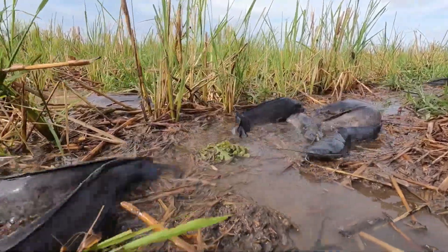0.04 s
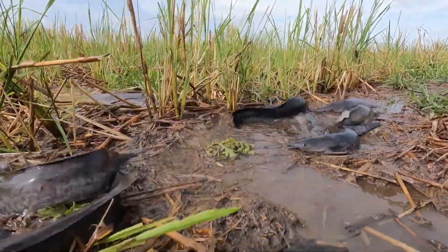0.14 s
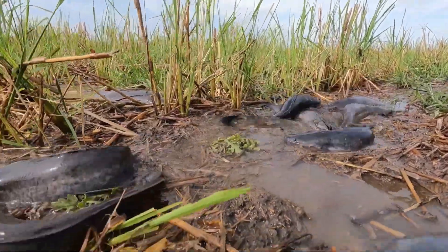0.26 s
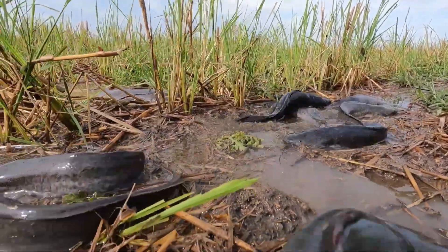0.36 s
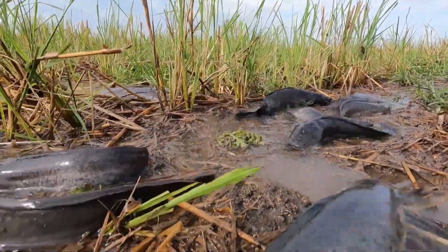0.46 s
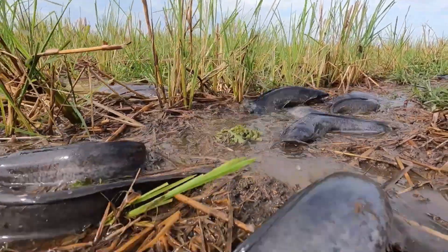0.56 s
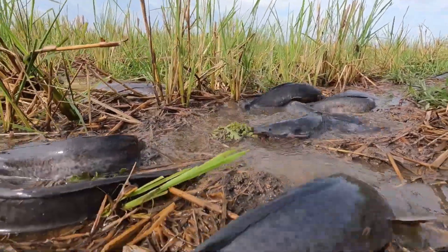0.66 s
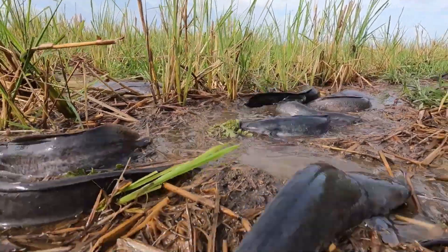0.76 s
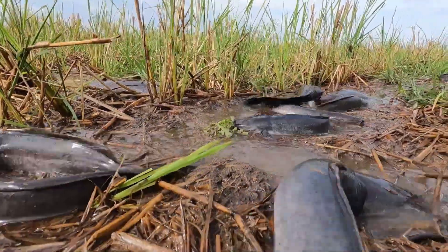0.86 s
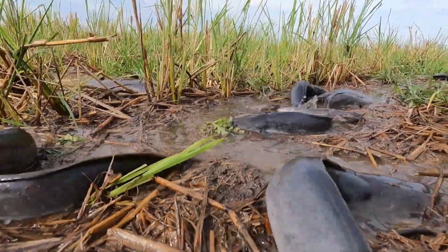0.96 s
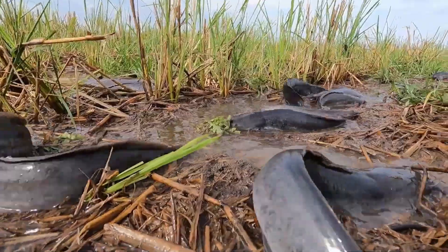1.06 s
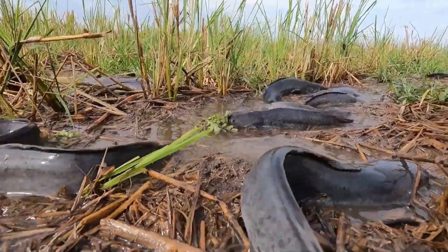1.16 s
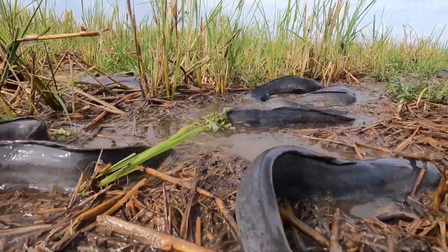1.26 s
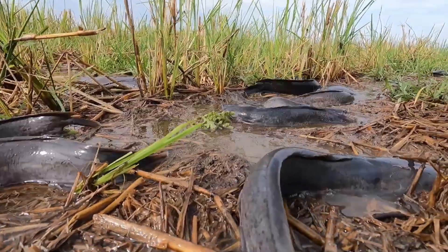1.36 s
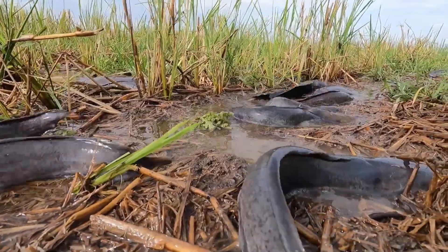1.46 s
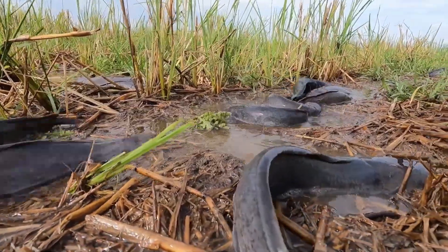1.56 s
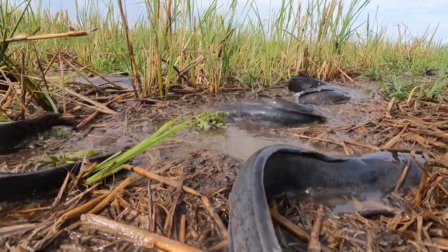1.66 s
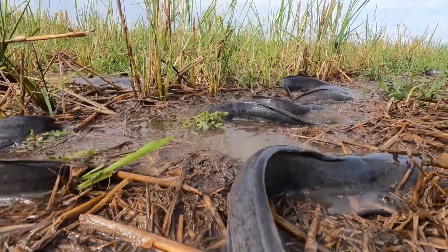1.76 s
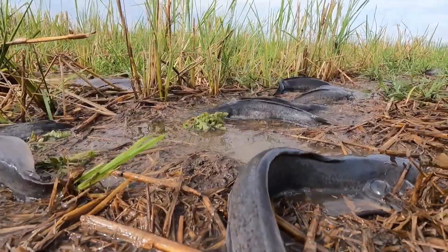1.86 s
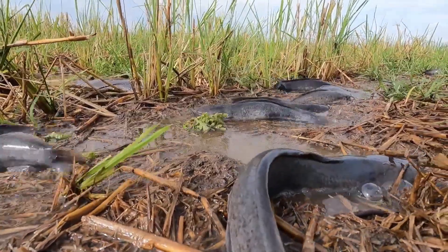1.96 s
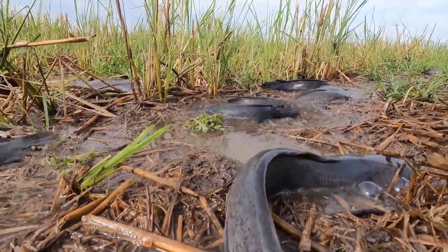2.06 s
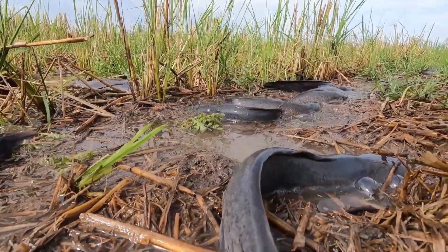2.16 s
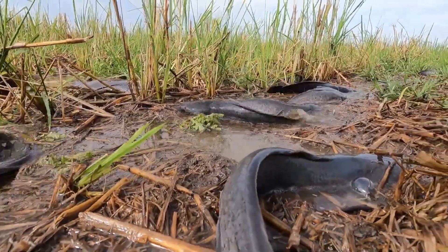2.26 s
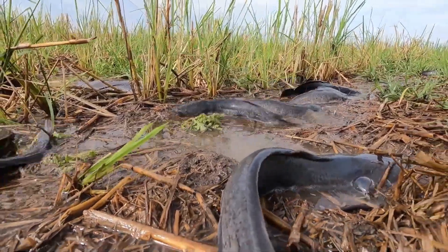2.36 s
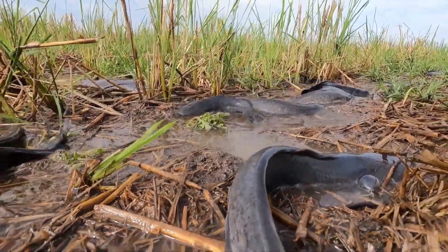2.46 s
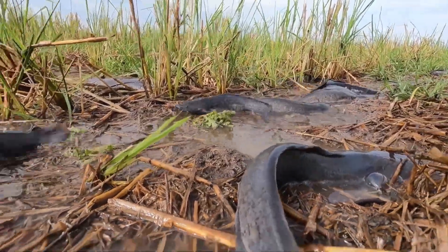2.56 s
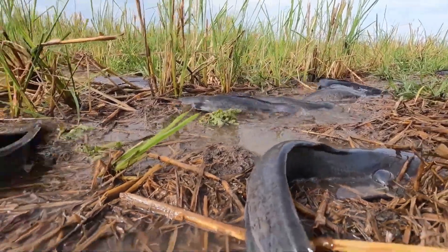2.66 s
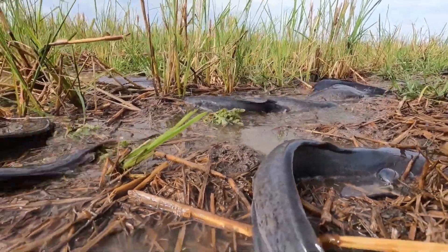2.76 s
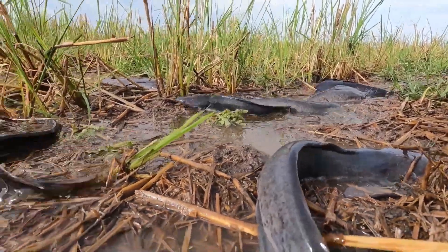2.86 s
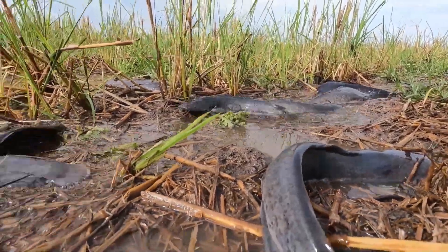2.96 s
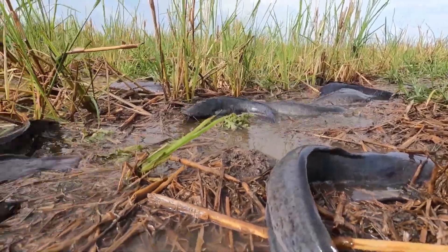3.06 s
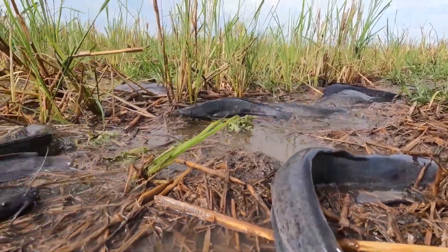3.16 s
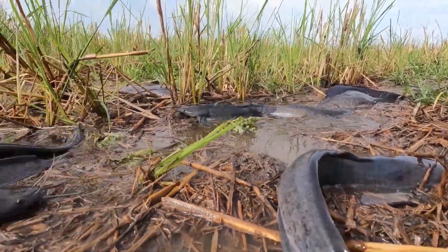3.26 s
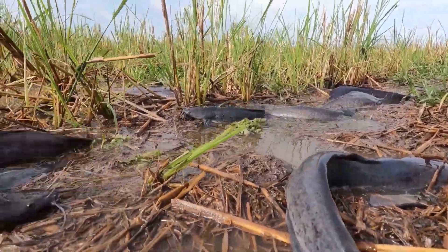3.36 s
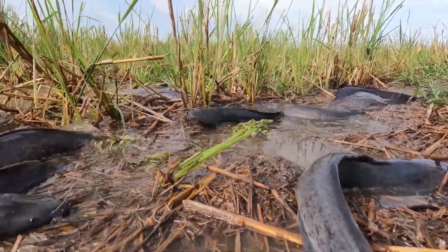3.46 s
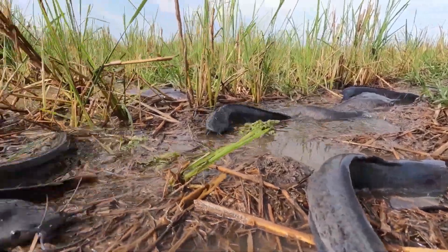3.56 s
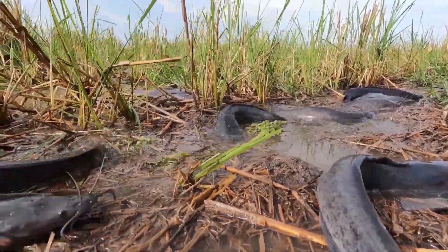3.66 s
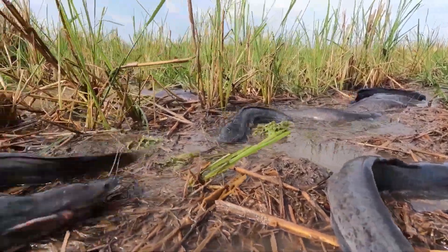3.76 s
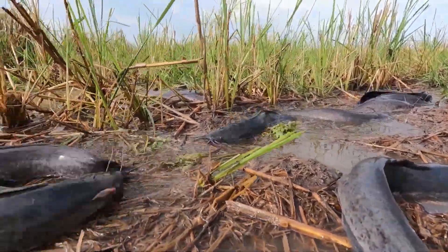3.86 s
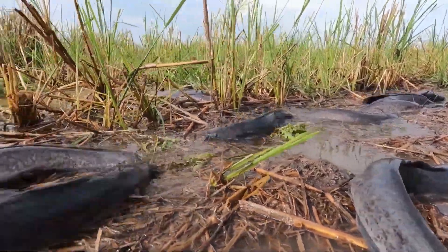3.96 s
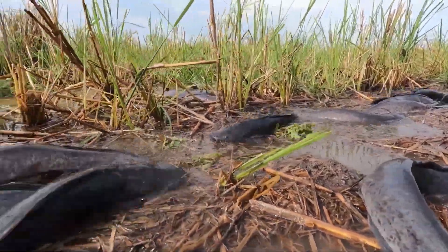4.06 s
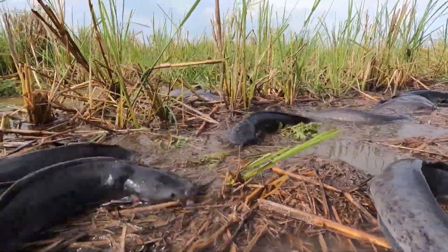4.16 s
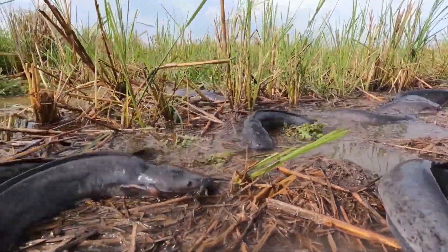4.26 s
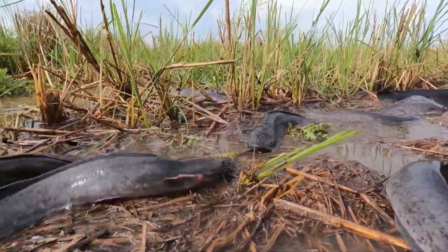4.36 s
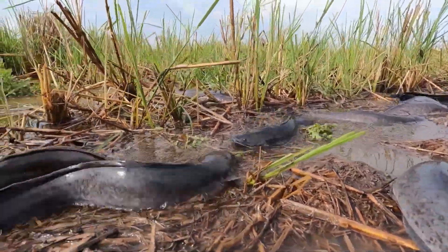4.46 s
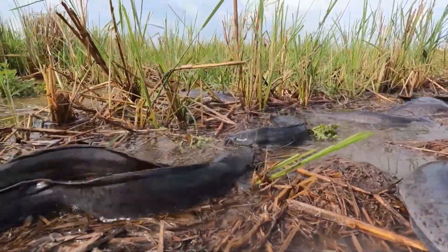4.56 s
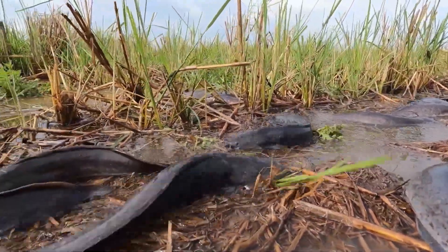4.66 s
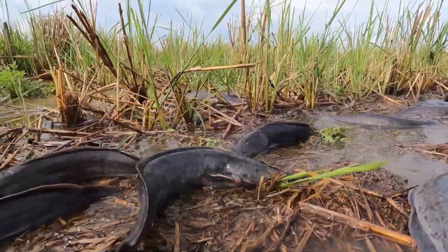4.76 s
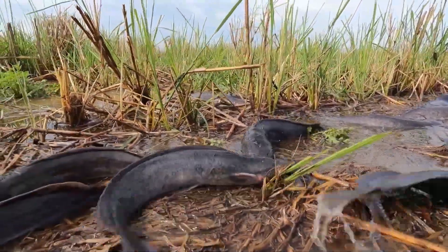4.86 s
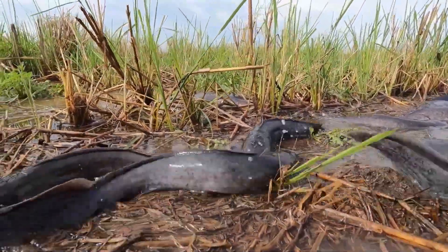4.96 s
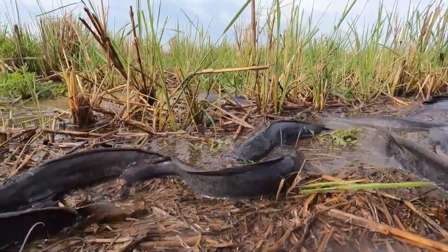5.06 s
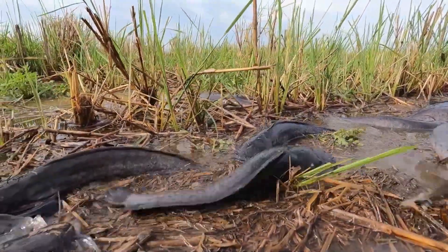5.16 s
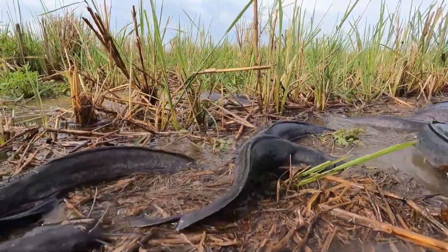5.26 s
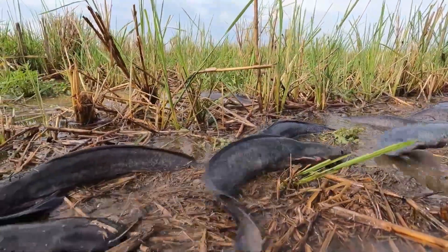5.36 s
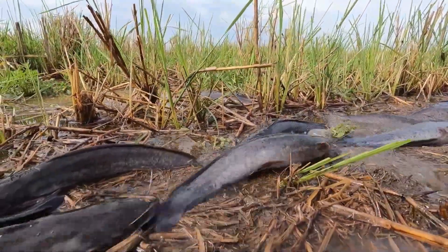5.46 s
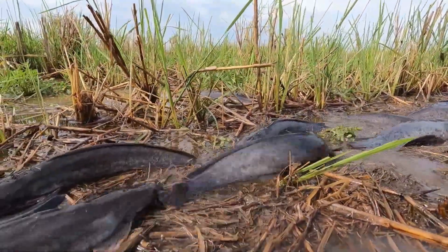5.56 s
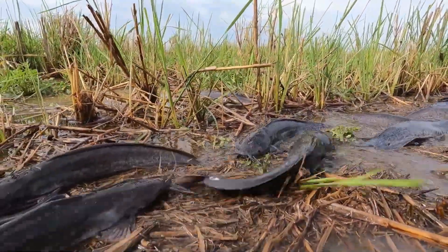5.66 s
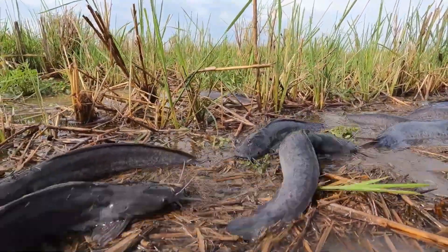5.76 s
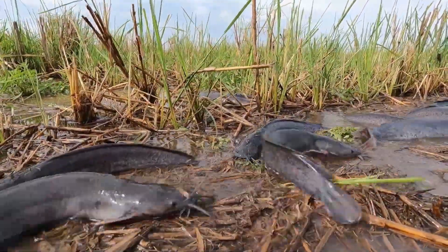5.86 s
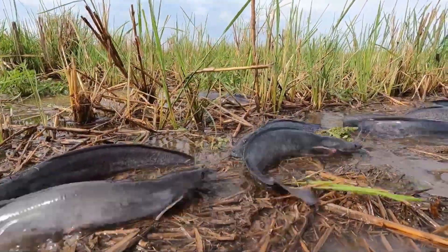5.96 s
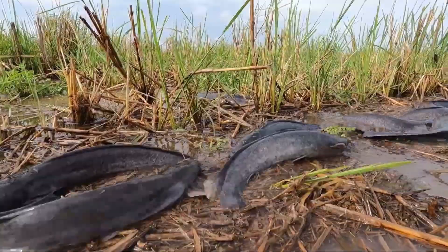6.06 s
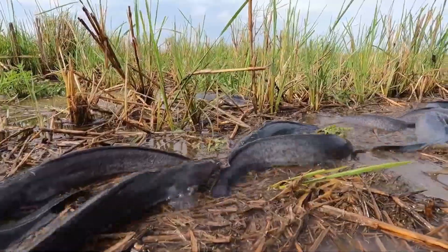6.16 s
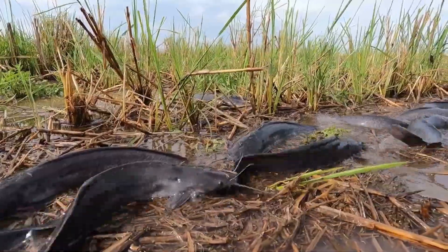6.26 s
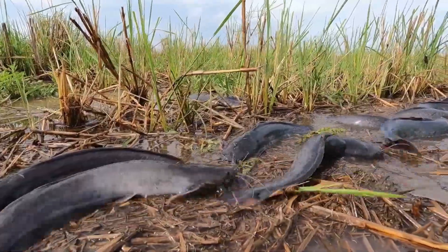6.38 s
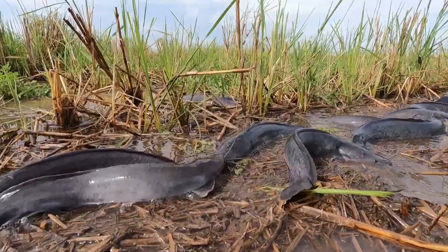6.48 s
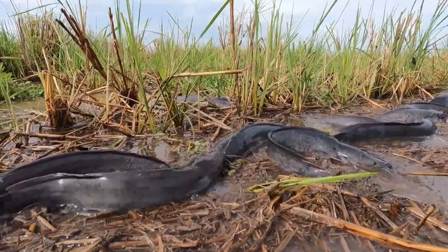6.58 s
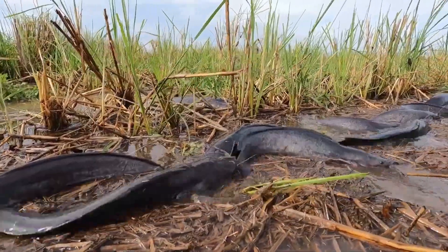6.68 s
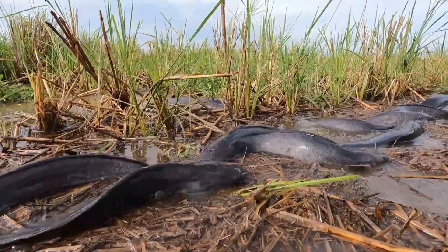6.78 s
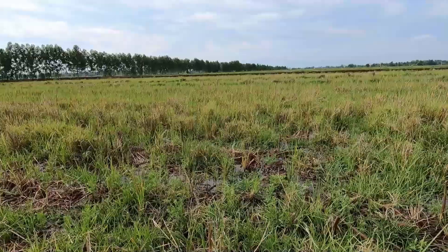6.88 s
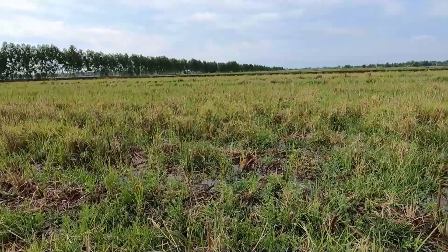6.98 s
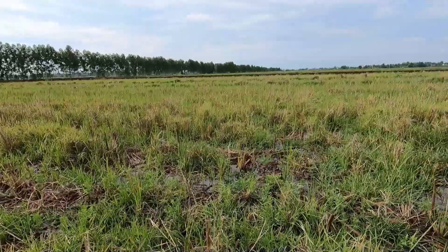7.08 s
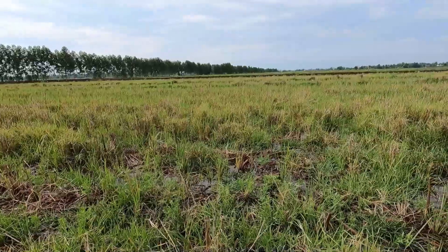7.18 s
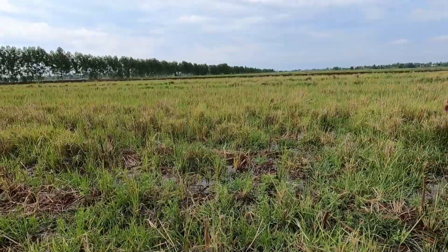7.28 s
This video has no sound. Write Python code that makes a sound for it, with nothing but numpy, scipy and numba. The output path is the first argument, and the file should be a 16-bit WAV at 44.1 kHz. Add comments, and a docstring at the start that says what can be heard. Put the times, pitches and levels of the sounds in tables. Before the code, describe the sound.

Close to a microphone on the ground, large catfish squirm in a shallow muddy puddle among wet straw. A busy rush of splashes, wet snaps and pops leads to heavy low thumps in the first second. Then sparser squelches, ticks and bubbles, two short croaks, and a busier wet stretch later. A steady low rumble lies underneath outdoors; a faint scrape with thin metallic ringing closes it.

```python
"""A shallow mud puddle among wet straw: large catfish wriggle close to a microphone on the ground.
Spray, slosh and sucking mud are crowds of tiny fading rings; snaps and pops add a crack and droplets.
Bubbles are gliding tones, a croak is a row of pulses through a throat, and a thump is a low ring.
Shaped noise makes a steady low rumble and faint air; soft tones make a bird's far-off hoots.
At the end a faint hiss comes with narrow metallic rings."""
import sys
import numpy as np
from scipy import signal
from scipy.fft import rfft, irfft
from scipy.io import wavfile
from scipy.ndimage import uniform_filter1d
from numba import njit

SR = 44100
rng = np.random.default_rng(int(sys.argv[2]) if len(sys.argv) > 2 else 0)


def unload_audio(sound):
    """Save the sound as a 16-bit wav file, at the path given as the first command line argument."""
    columns = np.transpose(np.atleast_2d(sound))
    # keep every value between -1 and 1, then stretch to whole-number steps
    steps = np.round(np.clip(columns, -1, 1) * 32767)
    wavfile.write(sys.argv[1], SR, steps.astype(np.int16))


N = 322812
T = np.arange(N) / SR  # time of every sample, s
LN1000 = np.log(1000)  # a fall of 60 dB
TOP_HZ = 15000  # nearly all sound above this is cut

# Low rumble over time: time_s, level_db
RUMBLE_LEVEL = [(0, -39), (.65, -39.5), (1.1, -43.5), (2.2, -40.5), (3.3, -40.5), (5, -42), (7.32, -39)]
# Tone of the rumble: pitch_hz, relative level_db (per Hz)
RUMBLE_TONE = [(12, -52), (20, -19.5), (48, 6.5), (70, -2), (151, -14.5), (420, -31.5), (560, -36),
               (910, -56), (1540, -120)]
# Left-right difference in the rumble: pitch_hz, level_db against the middle
RUMBLE_SIDES = [(60, -28.0), (130, -16.5), (300, -9.5)]
# Tone of the faint air noise: pitch_hz, relative level_db (per Hz)
AIR_TONE = [(530, -34), (900, 0), (1330, 4), (2120, 0), (5000, -3), (7900, -13), (9100, -6), (11200, -22),
            (14300, -40)]
# Left-right difference in the air: pitch_hz, level_db against the middle
AIR_SIDES = [(1000, 1), (7000, -1), (13000, 21)]
# Faint soft hoots far off, perhaps a dove: start_s, length_s, pitch_hz, level_db
HOOTS = [ (3.618, 0.057, 390, -57), (3.853, 0.05, 398, -57), (4.203, 0.077, 392, -61),
         (4.419, .085, 397, -58.5)]
# Narrow metal rings: pitch_hz, fade_db_per_s, level_db (before the ringing curve)
METAL_RINGS = [(587, 10, -57), (845, 120, -61), (1105, 150, -53), (1434, 250, -55), (1654, 30, -50),
               (1900, 40, -61)]
# How strongly the metal rings over time: time_s, level_db
RINGING_LEVEL = [(7.09, -12), (7.13, 6), (7.22, 6), (7.25, -5), (7.32, -4)]
# Hiss of the closing scrape over time: time_s, level_db (before it flickers)
SCRAPE_LEVEL = [(6.94, -54), (7.04, -46), (7.08, -49), (7.11, -43), (7.22, -41), (7.24, -44.5),
                (7.32, -52.5)]
# Tone of the scrape: pitch_hz, relative level_db
SCRAPE_TONE = [(400, -15), (1200, 3.5), (4500, 3), (6800, -8.5), (9000, -21), (15000, -56)]
# Left-right difference in the scrape: pitch_hz, level_db against the middle
SCRAPE_SIDES = [(1000, -46), (8000, -38)]
# Blows on the ground: start_s, level_db, pitch_hz, fade_s (by 60 dB), left_minus_right_db
GROUND_BLOWS = [(0.634, -18, 37.4, 0.15, 5), (0.652, -10.5, 41.5, 0.23, 4), (0.686, -11.5, 134, 0.039, -11),
                (0.715, -9, 64, 0.096, -5.5), (0.738, -10, 53, 0.093, -5), (0.754, -13.5, 100, 0.067, -4),
                (0.775, -26, 43.5, 0.14, -11), (6.575, -27.5, 168, 0.021, -19.5)]
# The body dragging over the ground: time_s, level_db
SCUFF_LEVEL = [(.64, -64), (.685, -27), (.76, -34), (.8, -64)]
# Tone of the dragging: pitch_hz, relative level_db
SCUFF_TONE = [(40, -18), (120, 6.0), (250, -4.0), (600, -41), (1500, -73)]
# Left-right difference in the dragging: pitch_hz, level_db against the middle
SCUFF_SIDES = [(100, -13), (300, -1)]
# Croaks: start_s, length_s, average pulses_per_s, pulse level_db (before the throat)
CROAK_CALLS = [(2.064, 0.11, 140, -15), (2.408, 0.13, 125, -4.5)]
# Hollow tones of the fish's body: pitch_hz, width_hz, level_db
THROAT_TONES = [(357, 157, 9), (580, 100, -3), (960, 360, -6)]
# Bubbles: start_s, level_db (before the waver), start_pitch_hz, end_pitch_hz, length_s
BUBBLE_CHIRPS = [(0.697, -37, 603, 860, 0.012), (0.799, -36.5, 1310, 1640, 0.014),
                 (0.878, -31.5, 996, 1760, 0.029), (1.023, -39, 2010, 2420, 0.012),
                 (1.353, -43, 1560, 1230, 0.026), (1.536, -48, 1850, 2150, 0.019),
                 (1.684, -34, 3660, 3800, .008), (1.707, -46, 2470, 3300, 0.032),
                 (1.811, -47, 1230, 1840, 0.033), (2.236, -50, 880, 1020, 0.025),
                 (2.259, -39, 1840, 2800, 0.016), (2.174, -40, 1770, 1850, 0.012),
                 (2.471, -35.5, 1550, 1750, 0.029), (2.87, -46, 1570, 1800, 0.0081),
                 (3.101, -30.5, 870, 940, 0.0088), (3.171, -33.5, 980, 2000, 0.03),
                 (3.218, -43, 940, 1200, 0.02), (3.472, -44, 755, 2270, 0.038),
                 (4.745, -47, 1710, 2400, 0.026), (4.751, -48.5, 1062, 1100, 0.017),
                 (4.88, -42.5, 1700, 1730, .016), (5.263, -35.5, 1560, 1710, 0.013),
                 (5.29, -49, 1210, 1400, 0.015), (5.369, -41, 1045, 1430, 0.029),
                 (5.681, -43.5, 1210, 1550, 0.025), (5.958, -36.5, 1020, 870, 0.025),
                 (6.005, -49, 787, 1030, 0.046), (6.069, -37.5, 500, 640, 0.015),
                 (6.082, -61, 643, 1350, 0.037), (6.173, -45.5, 625, 970, 0.016),
                 (6.275, -44, 1260, 1170, 0.01), (6.293, -43, 1660, 1760, 0.011),
                 (6.254, -33.5, 1340, 1540, 0.019), (6.326, -40.5, 676, 790, 0.02),
                 (6.374, -41.5, 1130, 925, 0.024), (6.408, -44, 864, 700, 0.015),
                 (6.449, -41.5, 653, 1800, 0.059), (6.45, -43, 2030, 3250, 0.016),
                 (6.533, -45.5, 907, 1530, 0.034), (6.732, -43, 1190, 1590, 0.026),
                 (6.834, -41.5, 1400, 1390, 0.018)]
# Air pockets popping out of the mud: start_s, level_db, pitch_hz, left_minus_right_db
MUD_POPS = [(.064, -29.5, 1590, -5), (0.102, -32, 2400, 4), (0.1149, -32, 2500, 6),
            (0.2653, -20.5, 2110, -1), (0.2963, -21.5, 2400, 2), (0.3127, -10.5, 1250, 1),
            (0.3195, -14.5, 1740, 8), (0.3655, -18, 1900, 0), (0.4022, -34.5, 1950, 8),
            (0.462, -18.5, 1550, 1), (0.4906, -21.5, 1640, 9), (0.5333, -21.5, 2100, 1),
            (0.6193, -23, 1680, 2), (0.6668, -34, 1550, 4), (0.7257, -26, 2870, -7),
            (0.7463, -21.5, 2140, 6), (0.8812, -30, 1100, -1), (1.1163, -27.5, 1470, 1),
            (1.321, -30, 1570, -1), (1.3979, -34, 1610, -1), (1.488, -40, 1510, 0), (1.515, -35.5, 1300, 3),
            (1.7839, -28, 1900, 1), (2.02, -38, 1530, 2), (2.1376, -27.5, 2300, 1),
            (2.1561, -31.5, 1490, 0), (2.6632, -30.5, 1730, 3), (2.7121, -31, 1700, -7),
            (2.7703, -26, 2330, -8), (2.785, -30, 1960, -5), (3.1067, -28.5, 2120, 1),
            (3.1556, -25, 2340, -6), (3.2193, -26, 1110, 0), (3.2514, -35.5, 1780, -8),
            (3.707, -35.5, 1440, -3), (3.737, -38, 1240, -3), (3.7548, -33.5, 2330, 2),
            (3.893, -14, 1345, -1), (4.158, -39.5, 1740, -2), (4.2465, -32.5, 2140, -10),
            (4.3057, -38, 1500, -4), (4.5453, -25, 3070, -7), (4.5789, -28.5, 820, -3),
            (4.5987, -30.5, 1800, -9), (4.7798, -25, 2480, -6.5), (4.8344, -28.5, 2840, -8),
            (5.0061, -32.5, 1410, 0), (5.1236, -31, 1610, 6), (5.1359, -13.5, 1516, -4),
            (5.189, -39, 1820, 2), (5.5665, -29.5, 1660, 7), (5.6184, -27, 1690, 0),
            (5.6672, -30.5, 1460, 1), (5.855, -32, 1000, 3), (5.8763, -27.5, 2210, -1),
            (5.998, -35.5, 2370, 2), (6.144, -32.5, 1800, -10), (6.1627, -30, 1890, -10),
            (6.2544, -23.5, 1310, 2), (6.578, -21, 2180, -5), (6.6514, -25.5, 1850, -8),
            (6.896, -27.5, 840, -2), (7.1392, -47, 1270, -5), (7.227, -37, 1070, -2), (7.296, -29, 1180, 1)]
# Thin water films snapping off skin and straw: start_s, level_db, pitch_hz, left_minus_right_db
FILM_SNAPS = [(0.0618, -24.5, 2970, 0), (0.19, -25.5, 5150, 1), (0.2239, -32.5, 5070, -4),
              (0.2967, -24, 2830, 1), (0.3031, -14.5, 3200, 1), (0.3177, -20.5, 4970, -14),
              (0.3225, -15, 2970, 0), (0.3385, -31, 6400, 8), (0.3619, -17.5, 4230, 1),
              (0.4426, -25, 4400, 1), (0.4821, -25, 5400, 2), (0.4896, -26, 4900, 5),
              (0.5336, -25, 3640, 2), (0.6103, -24.5, 5070, 1), (0.7165, -18.5, 3620, -2),
              (0.7213, -11, 3680, 2), (0.7505, -7, 840, -3), (0.7507, -17.5, 3140, -5),
              (0.8811, -28.5, 3250, 1), (0.891, -30.5, 5500, 1), (0.9818, -32, 3220, -3),
              (1.0147, -28.5, 3680, 0), (1.035, -32.5, 4600, 5), (1.1172, -31.5, 3100, -8),
              (1.433, -33, 3960, 0), (1.6214, -17.5, 5950, 0.5), (1.641, -38, 7000, 0),
              (1.6798, -30, 4260, 2), (1.7095, -34.5, 3200, 0), (1.8465, -13.5, 3460, -3),
              (1.8649, -37, 4170, -5), (1.9091, -34.5, 3600, 0), (1.989, -35.5, 7100, -1),
              (2.042, -31, 2190, 1), (2.138, -34, 3200, 3), (2.2032, -25, 4100, -4), (2.227, -30, 2720, -4),
              (2.343, -29, 1490, 0), (2.3488, -31.5, 3630, -7), (2.4208, -29.5, 4200, -5),
              (2.4547, -23.5, 3550, -7), (2.5115, -31, 3530, 0), (2.535, -34.5, 2650, -11),
              (2.7923, -32, 4100, -1), (2.8996, -24, 5500, -3), (3.0745, -29.5, 3340, -5),
              (3.1418, -24.5, 5320, 0), (3.4379, -30.5, 2830, -5), (3.8317, -38, 6060, 0),
              (3.8933, -28, 2920, -6), (3.9054, -27.5, 3320, 0), (3.99, -45, 5500, -2),
              (4.207, -44, 3740, -3), (4.2422, -37, 7840, 1), (4.3872, -23.5, 5730, -4),
              (4.5484, -17.5, 5200, -1), (4.5907, -29.5, 5560, 1.5), (4.728, -37.5, 3270, 3),
              (4.737, -42, 5000, 0), (4.745, -35.5, 4500, 2), (4.8348, -21, 4850, -3),
              (4.9115, -38.5, 4800, -2), (4.942, -34, 4000, -3), (5.0063, -30.5, 7400, 0),
              (5.0326, -30, 4400, -1), (5.061, -25.5, 6600, 0), (5.0925, -27.5, 4460, 0),
              (5.1173, -26, 4000, -6), (5.1295, -27, 5540, 2), (5.136, -32, 1830, -4),
              (5.2362, -37, 5140, 1), (5.281, -31, 4170, -4), (5.2866, -28, 4000, 2),
              (5.3094, -16.5, 4020, -4), (5.3358, -29, 5800, 10), (5.6188, -20.5, 3750, 1),
              (5.729, -25, 890, -3), (5.7773, -30, 1200, -1), (5.8328, -24, 3320, 5),
              (5.8679, -21.5, 4520, -1), (5.8768, -17.5, 4880, 2), (5.9413, -28, 3260, -1),
              (6.1626, -20.5, 4340, -3), (6.2626, -19, 3100, -2.5), (6.3402, -26.5, 4150, 0),
              (6.4033, -20.5, 4870, -2), (6.5399, -27.5, 4800, 1), (6.5476, -20.5, 3360, -5.5),
              (6.6511, -27.5, 2870, -4), (6.6839, -29.5, 3620, -3), (6.894, -29.5, 4570, -2),
              (6.9285, -13.5, 1300, 0), (6.9289, -28, 3340, 0), (7.035, -31, 3800, 0),
              (7.221, -27.5, 4570, 0)]
# Trickle between the twists: time_s, spray_level_db, slosh_level_db, mud_sucking_level_db
TRICKLE_LEVELS = [(0, -61, -53, -49.5), (.8, -59.5, -52, -45.5), (1.3, -80.5, -59, -65),
                  (2.2, -62.5, -63, -51.5), (3, -67.5, -61.5, -59.5), (4.2, -77, -71.5, -61),
                  (5.2, -77, -56, -79), (5.8, -68, -53, -44.5), (6.1, -72, -60.5, -54),
                  (7.32, -67.5, -71, -62)]
# Twists of a fish body: peak_s, spray_level_db, slosh_level_db, length_s
BODY_TWISTS = [(0.04, -50.5, -60, 0.072), (0.125, -43, -39, 0.058), (0.18, -49.5, -65, 0.11),
               (0.311, -39, -32, 0.15), (0.362, -33, -27, 0.028), (0.48, -45.5, -39.5, 0.14),
               (0.614, -48, -36.5, 0.057), (0.744, -48, -42, 0.088), (0.888, -44, -29.5, 0.023),
               (1.033, -50, -66, 0.1), (1.114, -76, -44, 0.066), (1.189, -52.5, -53.5, 0.25),
               (1.324, -44, -50, 0.066), (1.505, -63.5, -57.5, 0.68), (1.62, -50, -56.5, 0.053),
               (1.72, -48.5, -53, 0.023), (1.785, -57, -41, 0.037), (1.87, -57, -69, 0.29),
               (1.979, -78, -49, 0.14), (2.225, -42.5, -53, 0.058), (2.341, -51.5, -45, 0.055),
               (2.47, -62, -54, 0.76), (2.742, -54, -46.5, 0.12), (2.91, -42.5, -69.5, 0.039),
               (2.953, -45, -71, 0.03), (3.156, -46.5, -39, 0.065), (3.318, -58.5, -55.5, 0.39),
               (3.506, -88, -60, 0.75), (3.716, -59, -56, 0.33), (3.91, -55, -49, 0.068),
               (3.976, -58, -67, 0.1), (4.149, -62.5, -57.5, 0.22), (4.253, -51, -48.5, 0.036),
               (4.332, -65, -51, 0.072), (4.388, -51, -48, 0.068), (4.552, -49.5, -54, 0.11),
               (4.838, -45.5, -49, 0.06), (5.008, -52.5, -53.5, 0.65), (5.1, -44, -51, 0.094),
               (5.347, -42, -45.5, 0.15), (5.602, -38.5, -40.5, 0.074), (5.767, -52, -47, 0.18),
               (5.925, -54.5, -51.5, 0.49), (6.158, -45.5, -63, 0.037), (6.248, -45, -50.5, 0.024),
               (6.318, -53.5, -55, 0.15), (6.562, -52, -46.5, 0.15), (6.66, -56.5, -50, 0.12),
               (6.881, -49, -44, 0.11), (7.22, -48.5, -68, 0.024)]
# Left-right difference in the drop hiss: pitch_hz, level_db against the middle
MIST_SIDES = [(1000, -8), (7000, -6), (11000, 2)]
# Microphone tone: pitch_hz, level_db
MIC_TONE = [(600, -6.5), (4500, 6), (6200, 9.5), (8500, 0), (11000, -7), (14000, -10)]
# Top end of the left and the right microphone opening: pitch_hz, level_db
LEFT_TOP, RIGHT_TOP = [(7000, 0), (13000, 4)], [(7000, 0), (13000, -4)]


def undb(db):
    """Turn decibels into a plain multiplier."""
    return 10 ** (np.asarray(db) / 20)


def level_curve(points, before_db=None, after_db=None):
    """Join (s, dB) points by straight lines; give the dB at every sample."""
    return np.interp(T, *np.transpose(points), left=before_db, right=after_db)


def colour(x, points):
    """Make each pitch louder or softer by (Hz, dB) points."""
    hz, db = np.transpose(points)
    f = np.maximum(np.fft.rfftfreq(N, 1 / SR), 1)
    gain = undb(np.interp(np.log(f), np.log(hz), db))
    return irfft(rfft(x) * gain, N)


def unit(x):
    """Scale a sound to an average (rms) level of 1."""
    return x / np.sqrt(np.mean(x ** 2))


def band(x, hz, width_hz):
    """Let one hollow resonance pick out its own pitch."""
    return signal.lfilter(*signal.iirpeak(hz, hz / width_hz, SR), x)


def walk(rate):
    """Wander smoothly around 0: random steps held 1 / rate s, then smoothed twice."""
    k = int(SR / rate)
    steps = np.repeat(rng.standard_normal(N // k + 1), k)
    return 2.0 * uniform_filter1d(uniform_filter1d(steps, k), k)[:N]


def wide_noise(points, side):
    """Shape noise by (Hz, dB) points; a second noise, added left and subtracted right, widens it."""
    mid, other = colour(rng.standard_normal((2, N)), points)
    return unit(mid + colour(other, side) * np.array([[1], [-1]]))


@njit
def add(out, s, left, right, hz, t60, glide, rise):
    """Add rings that swell, then fade by 60 dB over t60 s while the pitch climbs by glide octaves."""
    for k in range(len(s)):
        i, n = int(s[k] * SR), int(t60[k] * SR)
        fade, climb = np.exp(-np.log(1000.) / n), 2 ** (glide[k] / n)
        swell = np.exp(-1 / (rise[k] * SR))
        level, step, phase, unswollen = 1., 2 * np.pi * hz[k] / SR, 0., 1.
        for j in range(max(i, 0), min(i + n, out.shape[1])):
            phase += step
            step = min(step * climb, 2.8)  # stay below the highest pitch that fits
            level *= fade
            unswollen *= swell
            value = level * (1 - unswollen) * np.sin(phase)
            out[0, j] += left[k] * value
            out[1, j] += right[k] * value


def rings(s, db, hz, t60, glide, pan_db, rise_turns):
    """Place fading rings left to right; each swells over some of its own turns."""
    columns = np.broadcast_arrays(s, db, hz, t60, glide, pan_db)
    s, db, hz, t60, glide, pan_db = (np.ascontiguousarray(c, float) for c in columns)
    out = np.zeros((2, N))
    left, right = undb(db + pan_db / 2), undb(db - pan_db / 2)
    add(out, s, left, right, hz, np.clip(t60, .0005, 2), glide, max(rise_turns, .01) / hz)
    return out


def rumble():
    """Low noise whose level drifts slowly."""
    return wide_noise(RUMBLE_TONE, RUMBLE_SIDES) * undb(level_curve(RUMBLE_LEVEL))


def air():
    """Faint airy noise whose level wanders a little around -65 dB."""
    return wide_noise(AIR_TONE, AIR_SIDES) * undb(-65 + 1.3 * walk(9.6))


def hoots():
    """Far-off bird hoots: steady pure tones with soft edges."""
    out = np.zeros(N)
    for s, long, hz, db in HOOTS:
        shape = np.sin(np.pi * np.clip((T - s) / long, 0, 1)) ** .5
        out += undb(db) * shape * np.sin(2 * np.pi * hz * T)
    return out


def metal():
    """A few narrow metal tones, as if struck, fade unevenly beside a faint hissing scrape."""
    since = np.maximum(T - RINGING_LEVEL[1][0], 0)  # the tones fade from the second point on
    tones = np.zeros(N)
    for hz, fade, db in METAL_RINGS:
        level = undb(db - fade * since + 4.3 * walk(90))
        tones += level * np.sin(2 * np.pi * hz * np.cumsum(1 + .004 * walk(40)) / SR)
    ring = tones * undb(level_curve(RINGING_LEVEL, before_db=-120))
    hiss_db = level_curve(SCRAPE_LEVEL, before_db=-120) + 1.8 * walk(160)
    return ring + wide_noise(SCRAPE_TONE, SCRAPE_SIDES) * undb(hiss_db)


def thumps():
    """A fish thumps the ground: heavy, fading rings over the low noise of its dragging body."""
    s, db, hz, t60, pan = np.transpose(GROUND_BLOWS)
    blows = rings(s, db, hz, t60, 0, pan, rise_turns=0.039)
    return blows + wide_noise(SCUFF_TONE, SCUFF_SIDES) * undb(level_curve(SCUFF_LEVEL, -120, -120))


def croaks():
    """A fin spine ratchets unevenly in its socket; each slip is a short rattle that knocks the soft body."""
    peak, edge_db = 0.29, -10.5  # loudest at this share of the length; level at both ends
    pulses = np.zeros(N)
    for s, long, rate, db in CROAK_CALLS:
        on = (T > s) & (T < s + long)
        # a slip falls wherever the count of turns, made uneven, passes a whole number
        turns = np.cumsum(on * rate) / SR + .95 + .2 * on * walk(100)
        slips = np.diff(np.floor(turns), prepend=0) > 0
        swell_db = np.interp((T - s) / long, [0, peak, 1], [edge_db, 0, edge_db])
        pulses += slips * undb(db + swell_db + 3.5 * rng.standard_normal(N))
    # each slip opens a 200-sample burst of noise
    rattle = uniform_filter1d(pulses, 200, origin=99) * rng.standard_normal(N) * undb(11)
    body = sum(undb(db) * band(pulses + rattle, hz, width) for hz, width, db in THROAT_TONES)
    return signal.sosfilt(signal.butter(2, [180, 1300], "band", fs=SR, output="sos"), body)


def bubbles():
    """Wavering tones; wide pitch glides hurry at the end, as the bubble nears the surface."""
    out, waver = np.zeros((2, N)), undb(np.clip(2.5 * walk(260), -12, 3))
    for s, db, start_hz, end_hz, long in BUBBLE_CHIRPS:
        u = np.arange(int(long * SR)) / (long * SR)  # 0 at the start, 1 at the end
        octaves = abs(np.log2(end_hz / start_hz))
        hz = start_hz * (end_hz / start_hz) ** (u ** (.8 + .8 * octaves))
        edges = np.minimum(u * long / .001, 1) * np.minimum((1 - u) / .12, 1)
        fade = undb(-14 * u / (1 + .5 * octaves))  # wide glides fade less
        tone = undb(db) * edges * fade * np.sin(2 * np.pi * np.cumsum(hz) / SR)
        sides = undb(np.array([[1], [-1]]) * 0.7 * rng.standard_normal())
        out[:, int(s * SR):int(s * SR) + len(u)] += tone * sides
    return out * waver


def bursts(table, ring_s, crack_db, crack_s, octaves, drops_db, ahead_scale_s, after_scale_s, count):
    """A brief ring, a broad crack of short rings, and droplets scattered around the crack."""
    s, db, hz, pan = np.transpose(table)
    out = rings(s, db, hz, ring_s, 0.016, pan, rise_turns=0.2)
    for when, off, small in rng.random((len(s), count, 3)).transpose(1, 2, 0):
        crack_hz = hz * 2 ** (octaves * (off - .4))
        out += rings(s + .0006 * when, db + crack_db, crack_hz, crack_s, 0, pan, rise_turns=0.45)
        ahead = when < .3
        lag = np.where(ahead, -ahead_scale_s * when / 0.11, after_scale_s * (when - .3))
        # small droplets are softer, and so are the few ahead of the crack
        drop_db = db + 33.0 - 31.5 + drops_db - 12 * small - 14 * ahead
        drop_hz = hz * 2 ** (octaves * (small - .4))
        out += rings(s + lag, drop_db, drop_hz, 3 * crack_s, 0.44, pan, rise_turns=1.6)
    return out


def pops():
    """Air pockets pop out of the mud: longer rings with a weak crack."""
    return bursts(MUD_POPS, ring_s=0.015, crack_db=-7.0, crack_s=0.0019, octaves=1.78, drops_db=1.2,
                  ahead_scale_s=0.0066, after_scale_s=0.012, count=3)


def snaps():
    """Thin water films snap: very short rings with a strong crack."""
    return bursts(FILM_SNAPS, ring_s=0.0053, crack_db=0.018, crack_s=0.00058, octaves=1.62, drops_db=7.3,
                  ahead_scale_s=0.002, after_scale_s=0.0077, count=4)


def patter(level_db, lo_hz, hi_hz, turns, scatter_db, clump_db, wide_db, tilt_db, count):
    """Many small drops of random pitch and size swell in clumps; a few ring on as tiny bubbles."""
    s, pitch, size, long = rng.random((count, 4)).T
    clumps_db = clump_db * walk(110)
    s, hz = s * N / SR, lo_hz * (hi_hz / lo_hz) ** pitch
    db = np.minimum(-scatter_db * np.log(size), 12) + tilt_db * pitch + np.interp(s, T, clumps_db)
    pan = wide_db * np.interp(s, T, walk(27))
    t60 = turns * (.5 + 3 * long ** 4) / hz
    drops = rings(s, db, hz, t60, .35, pan, rise_turns=.9)
    # drops too fine to tell apart merge into a hiss
    mist_tone = [(.7 * lo_hz, -25), (lo_hz, 0), (hi_hz, -6), (1.4 * hi_hz, -30)]
    mist = undb(-8.5 + .5 * clumps_db) * wide_noise(mist_tone, MIST_SIDES)
    return unit(unit(drops) + mist) * undb(level_db)


def wriggling_levels():
    """Spray, slosh and sucking in dB: the trickle plus a quick rise and slower fall at each twist."""
    rise_share, fade_db = 0.84, 29  # the fall loses fade_db over one length; the rise takes this share
    suck_db = -6  # mud sucking in a twist, against its slosh
    s, *trickle_db = np.transpose(TRICKLE_LEVELS)
    power = np.array([undb(2 * np.interp(T, s, db)) for db in trickle_db])
    for at, spray_db, slosh_db, long in BODY_TWISTS:
        near = slice(max(int((at - 2 * long) * SR), 0), int((at + 3 * long) * SR))
        u = (T[near] - at) / long
        drop_db = fade_db * np.maximum(u, -u / rise_share)
        peaks_db = np.array([[spray_db], [slosh_db], [slosh_db + suck_db]])
        power[:, near] += undb(2 * (peaks_db - drop_db))
    return 10 * np.log10(power)


def wriggling():
    """Fish bodies throw up high spray, slosh the water, tick the straw and suck at the low mud."""
    spray_db, slosh_db, suck_db = wriggling_levels()
    spray = patter(spray_db, 2600, 10000, turns=10., scatter_db=3.8, clump_db=3.,
                   wide_db=6., tilt_db=0., count=13000)
    slosh = patter(slosh_db, 1050, 4000, turns=7., scatter_db=3.6, clump_db=3.,
                   wide_db=6., tilt_db=-2., count=4500)
    straw = patter(spray_db - 5, 2000, 7000, turns=1.5, scatter_db=5., clump_db=3.,
                   wide_db=6., tilt_db=0., count=900)
    mud = patter(suck_db, 230, 850, turns=1.6, scatter_db=2., clump_db=2.,
                 wide_db=4., tilt_db=2., count=3500)
    return spray + slosh + straw + mud


def scatter(wet):
    """Straw and banks return a short scatter, partly unlike at the two microphone openings."""
    shared, own = rng.standard_normal(1500), rng.standard_normal((2, 1500))
    tail = (.6 * shared + own) * np.exp(-LN1000 * np.arange(1500) / SR / .02)  # fades 60 dB in 0.02 s
    return undb(-30) * signal.fftconvolve(wet, tail, axes=1)[:, :N]


def scene():
    """Mix all sources; only wriggling, snaps and pops pass the microphone tone."""
    wet = colour(wriggling() + snaps() + pops(), MIC_TONE) + bubbles()
    wet += scatter(wet)
    return rumble() + air() + hoots() + metal() + thumps() + croaks() + wet


def record(dry):
    """Make the right microphone opening duller at the very top, then cut the top of both."""
    ports = np.array([colour(dry[0], LEFT_TOP), colour(dry[1], RIGHT_TOP)])
    return signal.sosfilt(signal.ellip(8, .2, 70, TOP_HZ, fs=SR, output="sos"), ports)


dry = scene()
out = record(dry)
unload_audio(out)
```